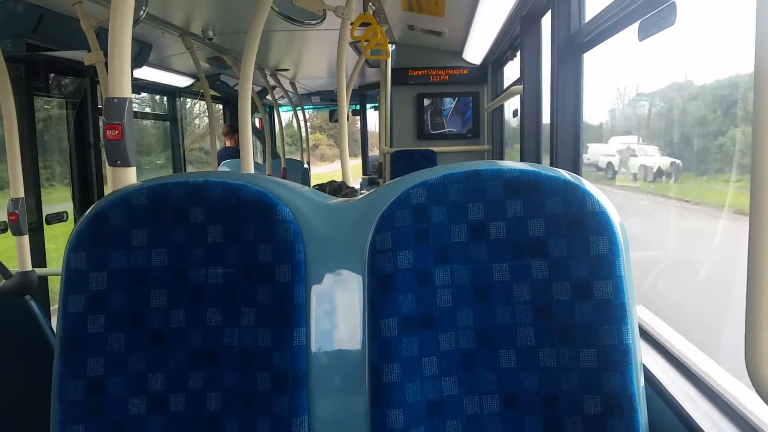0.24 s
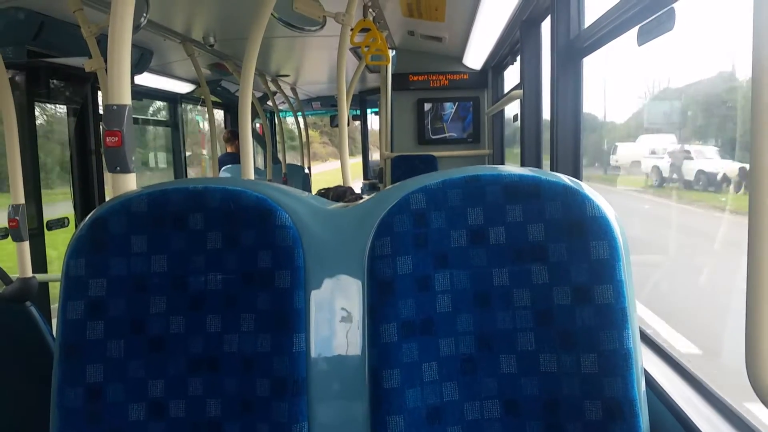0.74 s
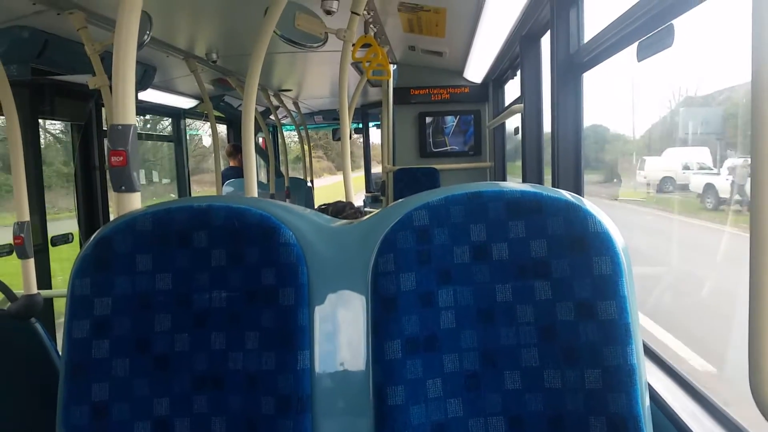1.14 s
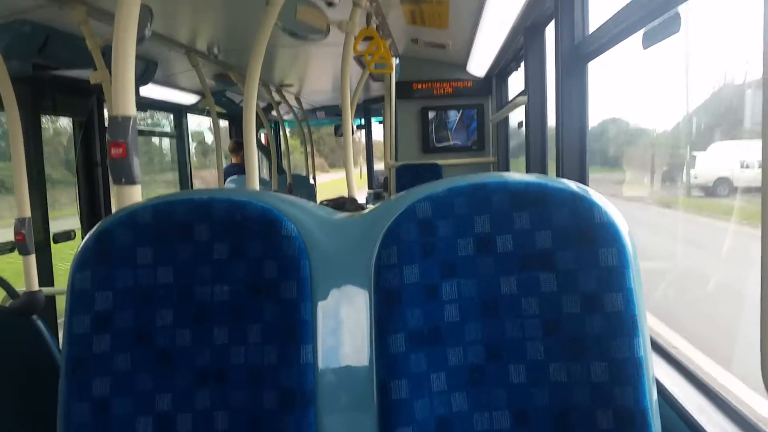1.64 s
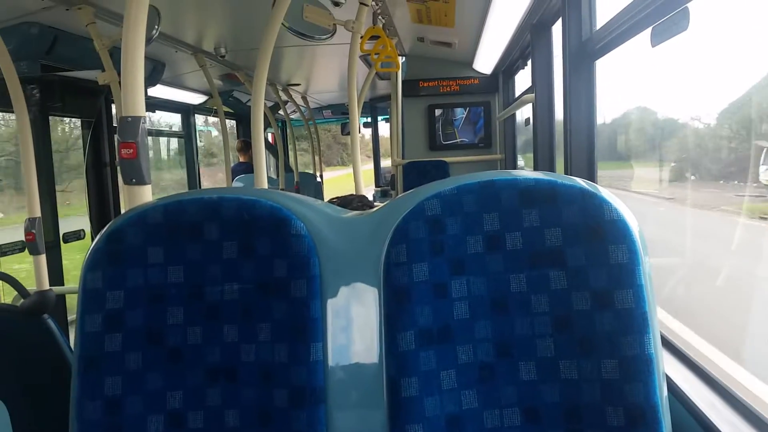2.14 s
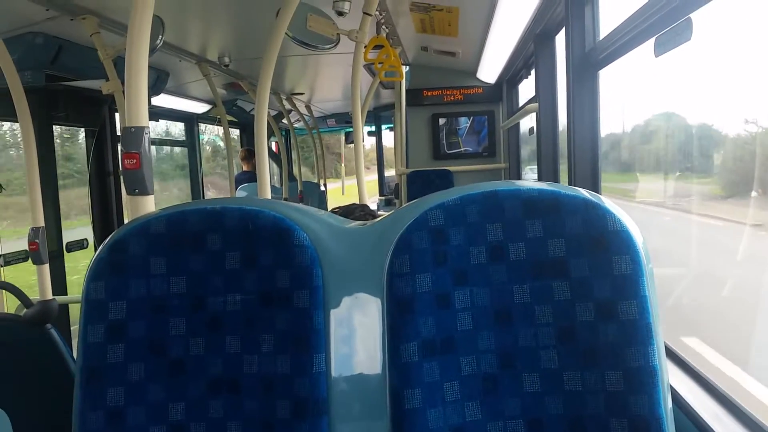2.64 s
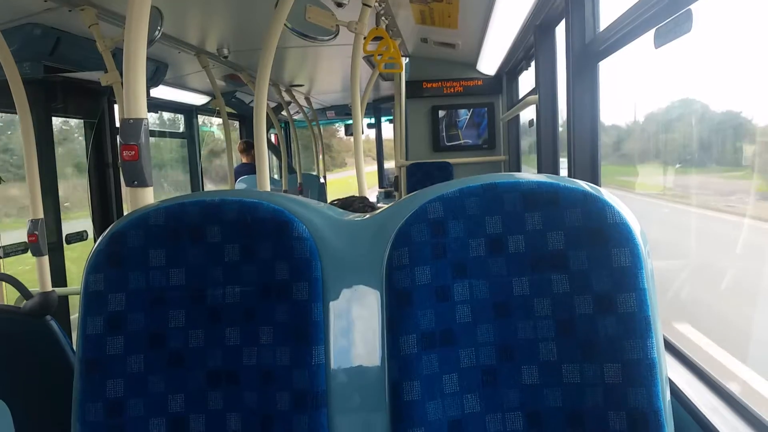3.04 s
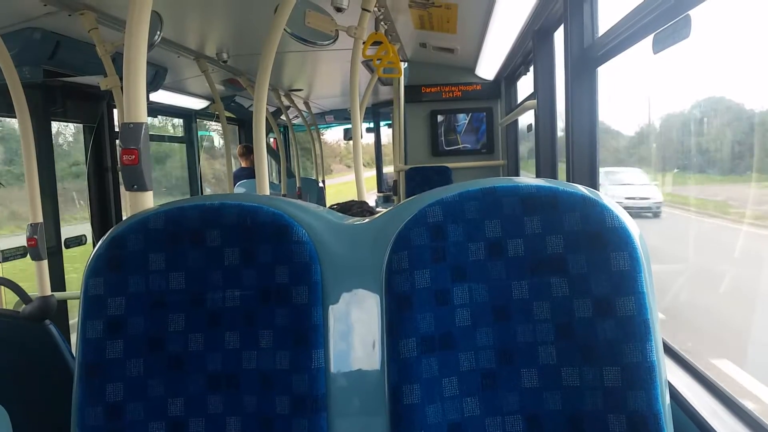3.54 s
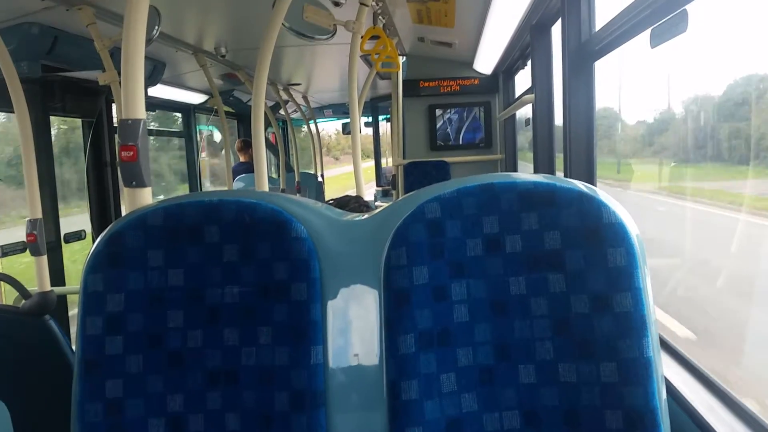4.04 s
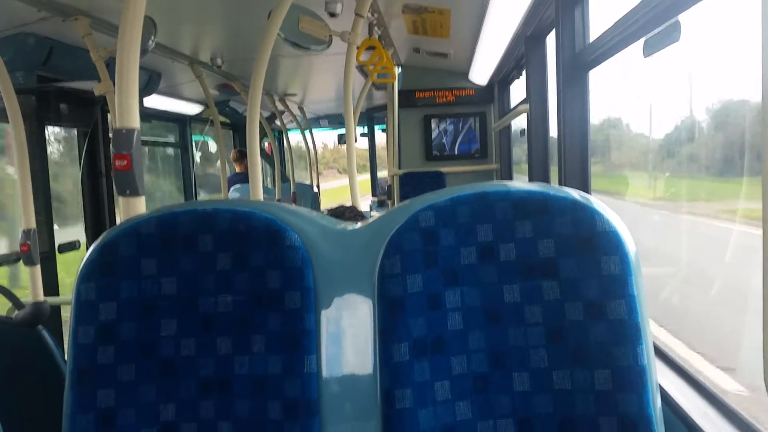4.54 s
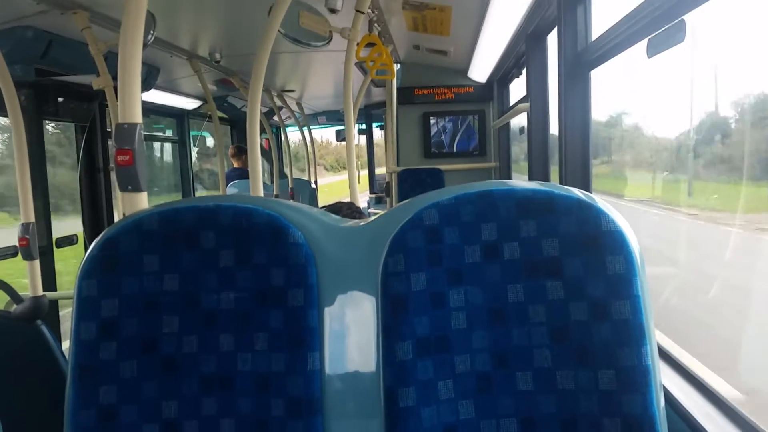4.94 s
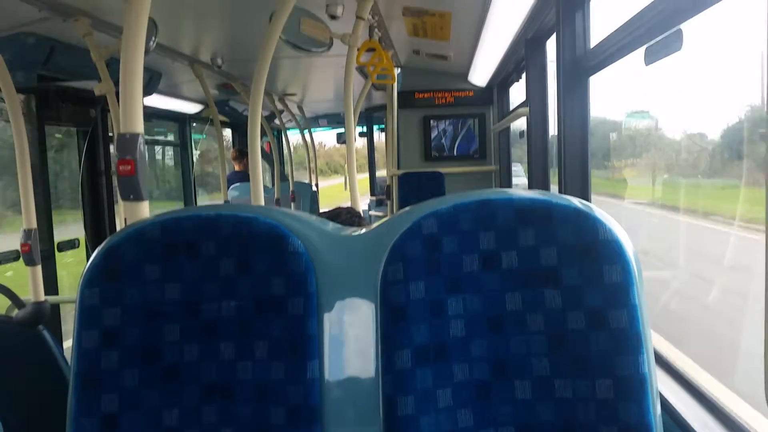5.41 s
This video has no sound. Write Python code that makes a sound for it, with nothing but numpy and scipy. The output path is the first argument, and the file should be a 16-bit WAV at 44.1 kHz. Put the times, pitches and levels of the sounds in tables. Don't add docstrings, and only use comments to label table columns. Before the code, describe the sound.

Heard from a passenger seat inside a bus, a diesel engine gives a deep, slightly uneven drone that climbs very gradually. Road rumble and tyre roar fill the cabin, with faint gear whine and thin hiss above. Small ticks and rattles come mostly in the first second and a half, a sharp click near three seconds, and another handle clatter around four and a half. Stereo handheld microphone, close cabin, no voices.

```python
import sys
import numpy as np
from scipy import signal
from scipy.fft import rfft, irfft, next_fast_len
from scipy.io import wavfile
from scipy.ndimage import uniform_filter1d

SR = 44100
rng = np.random.default_rng(int(sys.argv[2]) if len(sys.argv) > 2 else 0)


def transcribe(signal):
    frames = np.atleast_2d(signal).T
    limited = np.clip(frames, -1, 1)
    pcm = np.round(limited * 32767).astype(np.int16)
    wavfile.write(sys.argv[1], SR, pcm)


def nominal_scale(level):
    x = np.asarray(level, float) / 20
    return 10 ** x


N = 250047
TIME = np.arange(N) / SR

# [t/s, level/dB]
SURFACE = [(0, -13.5), (.5, -34), (1.1, -17.5), (1.45, -14.5), (1.65, -17), (2, -15.5), (2.35, -29.5),
           (2.65, -23), (2.95, -22), (3.4, -17), (3.7, -16.5), (4.1, -21.5), (4.45, -16), (4.8, -27.5),
           (5.05, -9), (5.35, -27), (5.55, -17), (5.67, -13)]
# [f/Hz, level/dB per Hz]
THUMP_SPECTRUM = [(7.1, -49), (12, 4), (50, -2.5), (65, -17), (110, -120)]
# [f/Hz, level/dB per Hz]
RUMBLE_SPECTRUM = [(24, -42), (40, -12.5), (75, -2.5), (99, -2), (160, -7), (187, -9.5), (237, -7),
                   (261, -14.5), (292, -20.5), (333, -22), (380, -45), (490, -34), (840, -120)]
# [f/Hz, level/dB per Hz]
ROAR_SPECTRUM = [(180, -19), (300, -0.5), (335, -2.5), (399, -7), (525, -5.5), (863, -12), (1020, -11),
                 (1160, -16.5), (1340, -12), (1510, -16.5), (1830, -18), (2000, -15.5), (2530, -26.5),
                 (2950, -29), (3400, -36.5), (4420, -56), (7480, -120)]
# [f/Hz, level/dB per Hz]
HISS_SPECTRUM = [(1800, -26), (2500, -16.5), (3600, -4), (4450, -3.5), (4900, -10), (6000, -8), (6800, -6),
                 (7650, -18), (8800, -10), (9800, -16.5), (11000, -21.5), (13300, -31), (15300, -29),
                 (15850, -23)]
# [f/Hz, correlation/1]
EAR_LIKENESS = [(30, .995), (60, .99), (130, .86), (290, .86), (520, .8), (700, .6), (860, .2), (1030, .2),
                (1250, .2), (1600, .45), (2050, .35), (2500, .12), (5000, .15)]
# [f/Hz, phase/rad]
EAR_LEAD = [(900, 0), (1050, -3.5), (1250, 1), (1600, 4.5), (1900, 2), (2070, 0.6), (2300, 4.5), (4300, 3)]
# [f/Hz, level/dB per Hz]
CHATTER_SPECTRUM = [(1800, -2), (2500, -4), (3300, -3), (4390, -6), (5920, -9), (7700, -9), (9260, -6),
                    (11500, -15.5), (13200, -20), (15800, -19.5)]
# [t/s, level/dB, duration/s, extra brightness/dB]
BUMPS = [(0, -54, .05, 3), (.281, -50, .013, 11), (.32, -49, 0.016, -5), (.409, -56, 0.02, 15),
         (.529, -48, .053, 7), (1.094, -44, 0.08, 6), (1.301, -51.5, .018, 13), (1.329, -50, 0.066, 10),
         (1.399, -49, .035, 5), (1.444, -57, .012, 12), (1.46, -50.5, 0.083, 11), (1.521, -48, .086, -2),
         (1.789, -62, .013, 18), (2.988, -45, 0.018, 0), (3.804, -60, 0.034, 1), (4.338, -51, .015, 0),
         (4.403, -37, 0.054, -20), (4.511, -46, 0.037, 3), (4.667, -55, 0.034, 12), (4.82, -59, .035, 11),
         (4.883, -45.5, .014, -3), (5.243, -54, .018, 0), (5.268, -58, 0.018, 5), (5.455, -53, .023, 5)]
# [t/s, level/dB, duration/s, ring f/Hz]
HANDLES = [
    (.082, -51, .03, 6300),
    (.572, -49, .02, 6700),
    (1.096, -34.5, 0.12, 1940),
    (1.46, -52, .069, 2000),
    (1.521, -42, 0.12, 1980),
    (4.405, -36.5, 0.056, 2150),
    (4.415, -47, .015, 9000),
    (4.511, -50, .03, 2010),
    (5.243, -50, .012, 3900),
]
# [t/s, peak level/dB, ring f/Hz, top-end level/dB, left-right level/dB]
TICKS = [(0.0358, -33, 5750, -15, -4), (0.3207, -44, 5920, -18, 0.5), (0.53, -30, 6600, -18, 11),
         (0.7891, -21.5, 5610, -33, 1), (1.0935, -18, 5830, -18, 4), (1.3005, -36, 10900, -11, 6),
         (1.3292, -20, 8540, -19, 4), (1.402, -27, 9470, -20, 6), (1.4596, -34, 9610, -11, 3),
         (1.5239, -29, 9560, -22, 4), (2.9867, -17.5, 7800, -25, -5), (2.9885, -34, 4900, -12.5, -8),
         (3.057, -35, 5610, -26, -9), (3.1268, -27, 9200, -18, -5), (4.2562, -29.5, 6760, -30, -5),
         (4.338, -37, 9570, -17, -1), (4.403, -30, 8670, -24, 11), (4.5121, -32, 6670, -20, 2),
         (4.667, -33, 6580, -17, 2), (4.8688, -37, 9640, -15, -3.0), (4.8868, -36, 9620, -15, -4),
         (5.1184, -34, 9680, -19, 4), (5.2438, -26, 7600, -27, -7), (5.4124, -34, 9340, -17, 2)]
# [f/Hz, rms level/dB, waver rate/(1/s)]
BUZZ_TONES = [(2197, -55, 16), (2925, -59, 140), (4394, -67, 25), (6593, -73, 40)]
# [t/s, f/Hz]
TURBO_PITCH = [(0, 8640), (1.5, 8900), (3, 9240), (4.5, 9600), (5.67, 9860)]
# [f/Hz, width/Hz, gain/dB]
TURBO_PANELS = [(8674, 9, 7), (8960, 50, 6), (9180, 40, 5), (9280, 25, 6), (9620, 70, 5), (9780, 60, 6)]
# [f/Hz, width/Hz, gain/dB]
GEAR_PANELS = [(1911, 2, 11), (1930, 10, 7), (1963, 9, 7), (1983, 8, 12.5), (2010, 16, 6), (2033, 8, 8),
               (2053, 7, 10), (2085, 12, -8)]
# [f/Hz, width/Hz, gain/dB]
DRIVELINE_PANELS = [(312.5, 7.5, 17), (338.5, 7, 14), (519, 2, 6), (538, 8, 4), (564, 8, 9), (978, 16, 9)]
# [multiple of the driveline/1, early level/dB, late level/dB]
MESH_TONES = [(2, -51, -56), (3, -53, -56), (4, -57, -59), (5, -58, -70)]
# [t/s, cycle rate/(1/s)]
ENGINE_SPEED = [(0, 8.63), (.71, 8.69), (1.42, 8.8), (2.13, 8.91), (2.84, 9.03), (3.54, 9.13), (4.25, 9.24),
                (4.96, 9.34), (5.67, 9.43)]
# [multiple of the cycle/1, rms level before the cabin/dB]
ENGINE_ORDERS = [(5, -30), (6, -26), (7, -36), (8, -30), (9, -23), (10, -22), (11, -25), (12, -24.5),
                 (13, -31), (14, -32), (15, -32), (16, -31), (17, -30), (18, -29.5), (20, -38), (21, -37),
                 (23, -36), (24, -31), (25, -42), (26, -42), (27, -37), (28, -38), (32, -42), (48, -48)]
# [f/Hz, width/Hz, gain/dB]
CABIN_MODES = [(51.8, 1.2, -5), (55.8, 2.6, 10), (73, 2, 4), (82.4, 3.1, 10.5), (94.5, 2.2, -7),
               (208, 4, 4), (213, 2, -12), (220, 4, 3), (226.5, 2.5, -5), (242.5, 2.5, 4), (248, 4, 9),
               (259, 5, -8)]
# [f/Hz, left-right level/dB]
PORT_TILT = [(60, 1.5), (92, -1.5), (140, -.5), (210, -2), (330, 1), (500, 2.5), (770, -1.5), (1170, .7),
             (1790, -2.0), (2740, -4.5), (4190, -7.5), (6410, -7), (9810, 5.5), (15000, 1.0)]


def evened(x):
    return x / np.sqrt(np.mean(x ** 2) + 1e-20)


def read(points, hz):
    f, value = np.transpose(points)
    return np.interp(np.log(hz + 1), np.log(f + 1), value)


def curves(rows):
    s, *columns = np.transpose(rows)
    return [np.interp(TIME, s, column) for column in columns]


def wander(rate):
    knots = rng.standard_normal(2000)
    return np.interp(TIME * rate, np.arange(2000), knots) * np.sqrt(1.5)


def swell(centre_s, width_s):
    return np.exp(-((TIME - centre_s) / width_s) ** 2)


def colour(x, points):
    margin, size = SR // 4, next_fast_len(N + SR)
    padding = [(0, 0)] * (x.ndim - 1) + [(margin, margin)]
    wide = np.pad(x, padding, "reflect", reflect_type="odd")
    gain = nominal_scale(read(points, np.fft.rfftfreq(size, 1 / SR)))
    return irfft(rfft(wide, size) * gain, size)[..., margin:margin + N]


def wash(points, patchy_db, size=2048):
    frames, hz = 4 * N // size + 5, np.fft.rfftfreq(size, 1 / SR)
    a, b, c, d, patches = rng.standard_normal((frames, len(hz), 5)).T
    patches = uniform_filter1d(patches, size=size // 100, axis=0)
    patches = evened(uniform_filter1d(patches, size=8192 * 2 // size, axis=1))
    same = np.clip(read(EAR_LIKENESS, hz), -1, 1)[:, None]
    lead = np.exp(-1j * read(EAR_LEAD, hz))[:, None]
    left, other = a + 1j * b, c + 1j * d
    z = np.array([left, same * left * lead + np.sqrt(1 - same ** 2) * other])
    z *= nominal_scale(read(points, hz)[:, None] + patchy_db * patches)
    return evened(signal.istft(z, nperseg=size, noverlap=3 * size // 4)[1][:, :N])


def tone(hz, db, waver_db, rate, apart):
    phase = 2 * np.pi * (np.cumsum(hz * np.ones(N)) / SR + rng.random())
    ears = []
    for _ in range(2):
        level = np.sqrt(2) * nominal_scale(db + waver_db * wander(rate))
        ears.append(level * np.cos(phase + apart * wander(rate)))
    return np.array(ears)


def ringing(hz, modes, grid=None):
    if grid is None:
        grid = np.linspace(hz.min(), hz.max(), num=400)
    gain_db = sum(peak_db * np.exp(-((grid - f) / width) ** 2) for f, width, peak_db in modes)
    return np.interp(hz, grid, gain_db)


def burst(lasting_s):
    t = np.arange(8000) / SR
    onset = np.minimum(t / 0.0017, 1)
    return onset * (np.exp(-(t / lasting_s) ** 2.5) + 0.15 * nominal_scale(-60 * t / 0.16))


def road():
    surface_db, = curves(SURFACE)
    rumble_db = -19 + np.linspace(-1.5, 1.5, N)
    roar_db = -27.5 + np.linspace(0, -1, N)
    thump = nominal_scale(surface_db) * wash(THUMP_SPECTRUM, patchy_db=-1.0, size=8192)
    rumble = nominal_scale(rumble_db) * wash(RUMBLE_SPECTRUM, patchy_db=-0.5, size=8192)
    roar = nominal_scale(roar_db) * wash(ROAR_SPECTRUM, patchy_db=0.7)
    hiss = nominal_scale(-49.5) * wash(HISS_SPECTRUM, patchy_db=1.8, size=512)
    return thump + rumble + roar + hiss


def window_seal():
    leak_spectrum = [(10300, -39), (11000, 3), (12400, 1), (13200, -38)]  # (f/Hz, level/dB)
    return nominal_scale(-58) * swell(2.4, 0.27) * wash(leak_spectrum, patchy_db=-3.0, size=1024)


def chatter():
    impacts_per_s, impact_decay_s = 900, 0.0028
    shake_db, loose_db, settle_s = -56.5, 4.5, 0.34
    impacts = nominal_scale(2.7 * np.minimum(rng.exponential(1, N), 4)) * (rng.random(N) < impacts_per_s / SR)
    density = signal.lfilter([1], [1, -np.exp(-1 / (impact_decay_s * SR))], impacts)
    flicker = np.sqrt(.5 + evened(density))
    trim = colour(flicker * rng.standard_normal((2, N)), CHATTER_SPECTRUM)
    trim /= np.std(colour(trim, [(4500, -40), (5000, 0), (11000, 0), (12000, -40)]))
    top = colour(trim, [(8000, -40), (10500, -5)])
    knocks = flicker * rng.standard_normal((2, N))

    jolts = np.zeros(N)
    jolts[[round(row[0] * SR) for row in BUMPS]] = 1
    loose = np.tanh(signal.lfilter([1], [1, -np.exp(-1 / (settle_s * SR))], jolts))
    out = nominal_scale(shake_db + loose_db * loose) * trim
    for s, db, lasting_s, bright_db in BUMPS:
        at = slice(round(s * SR), round(s * SR) + 8000)
        out[:, at] += burst(lasting_s) * nominal_scale(db) * (trim[:, at] + nominal_scale(bright_db) * top[:, at])
    for s, db, lasting_s, hz in HANDLES:
        at = slice(round(s * SR), round(s * SR) + 8000)
        resonator = signal.butter(2, [hz * .945, hz * 1.055], "band", fs=SR)
        ring = evened(signal.lfilter(*resonator, knocks[:, at]))
        out[:, at] += burst(lasting_s) * nominal_scale(db) * ring
    return out


def ticks():
    out, t = np.zeros((2, N)), np.arange(1500) / SR
    noise = rng.standard_normal((len(TICKS), 2, len(t)))
    decay = nominal_scale(-60 * t / 0.0072) + .1 * nominal_scale(-60 * t / 0.024)
    shape = np.minimum(t / 0.00036, 1) * decay
    treble = signal.butter(2, 11000, "high", fs=SR)
    for (s, db, hz, top_db, pan_db), puff in zip(TICKS, noise):
        resonator = signal.butter(2, [hz * .72, min(hz * 1.3, SR / 2.2)], "band", fs=SR)
        body = evened(signal.lfilter(*resonator, puff))
        edge = evened(signal.lfilter(*treble, puff))
        knock = (body + nominal_scale(top_db + 19.0) * edge) * shape
        start = round(s * SR)
        out[:, start:start + len(t)] += nominal_scale(db - 4.0 + pan_db * np.array([[.5], [-.5]])) * knock
    return out


def electric_buzz():
    swell_db = 4 * swell(2.4, .6)
    return sum(tone(hz, db + swell_db, 3.75, rate, 0.49 + rate / 200) for hz, db, rate in BUZZ_TONES)


def window_pane():
    return tone(508 + 8 * wander(30), -39 + np.linspace(0, -8, N), 4.55, 30, 0.75)


def turbo():
    hz, = curves(TURBO_PITCH)
    return tone(hz + 12 * wander(30), -64 + ringing(hz, TURBO_PANELS), 3.15, 40, 0.82)


def gear_whine():
    speed, = curves(ENGINE_SPEED)
    hz = 221 * speed
    return tone(hz, -51 + ringing(hz, GEAR_PANELS), 1.0, 11, 0.87)


def driveline():
    speed, = curves(ENGINE_SPEED)
    hz = 36.15 * speed
    overtone = hz * 5 / 3
    out = tone(hz, -45.5 + ringing(hz, DRIVELINE_PANELS), 0.9, 9.2, 0.31)
    out += tone(overtone, -46.5 + ringing(overtone, DRIVELINE_PANELS), 1.0, 6.7, 0.37)
    for multiple, early_db, late_db in MESH_TONES:
        mesh = round(multiple) * hz
        mesh_db = np.linspace(early_db, late_db, N) + ringing(mesh, DRIVELINE_PANELS)
        out += tone(mesh, mesh_db, 2, 6, .7)
    return out


def engine():
    speed, = curves(ENGINE_SPEED)
    out, grid = np.zeros((2, N)), np.arange(0, 500, .25)
    for order, db in ENGINE_ORDERS:
        hz = round(order) * speed
        uneven_db = 0.72 * wander(5.4)
        out += tone(hz, db + ringing(hz, CABIN_MODES, grid) + uneven_db, .5, 3, .04 + hz / 800)
    return out


def scene():
    background = road() + window_seal() + chatter() + ticks()
    whines = electric_buzz() + window_pane() + turbo() + gear_whine() + driveline()
    return background + whines + engine()


def top_cut(x):
    return signal.sosfilt(signal.butter(12, 15900, fs=SR, output="sos"), x)


def record(dry):
    edge_hz = 15850
    tilt = np.array([(45, 0), *PORT_TILT])
    ports = np.array([colour(dry[0], tilt * [1, .5]), colour(dry[1], tilt * [1, -.5])])
    limited = 1.1 * np.tanh(ports / 1.1)
    mix = colour(limited, [(edge_hz - 50, 0), (edge_hz + 50, -90)])
    return top_cut(mix)


dry = scene()
out = record(dry)
transcribe(out)
```